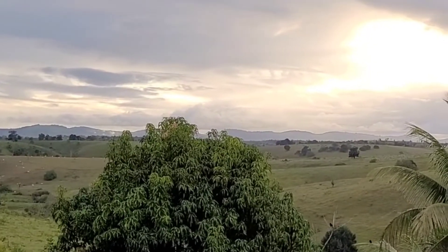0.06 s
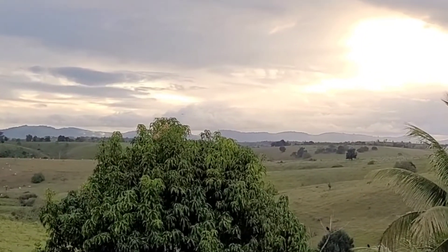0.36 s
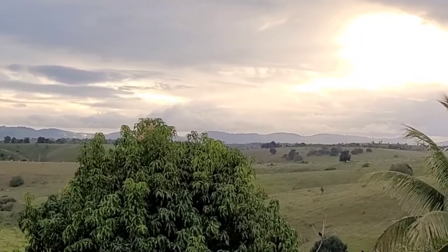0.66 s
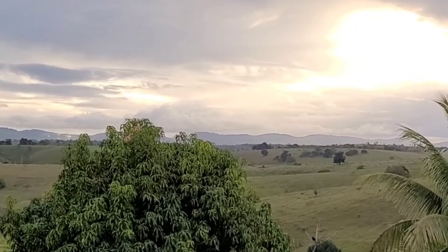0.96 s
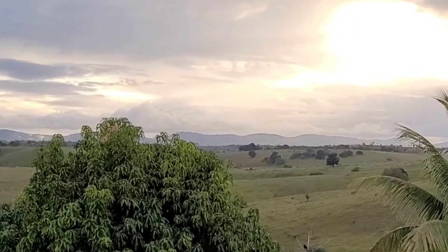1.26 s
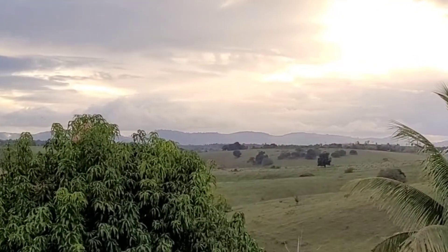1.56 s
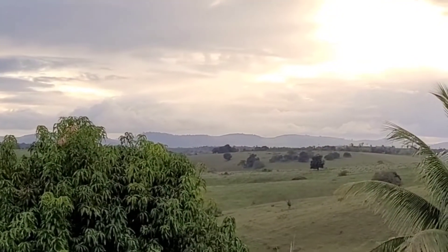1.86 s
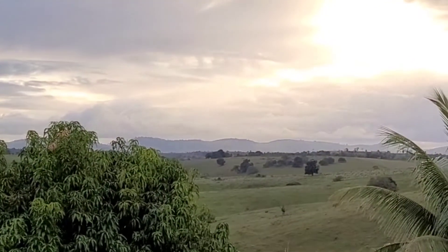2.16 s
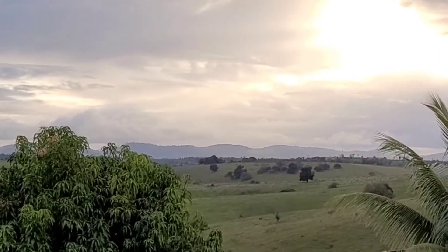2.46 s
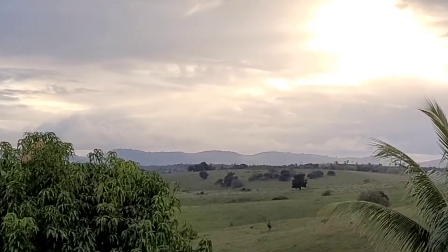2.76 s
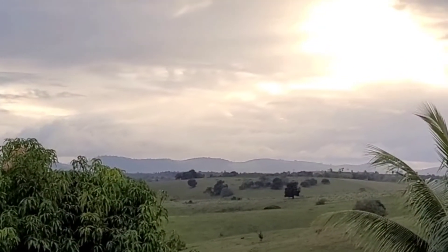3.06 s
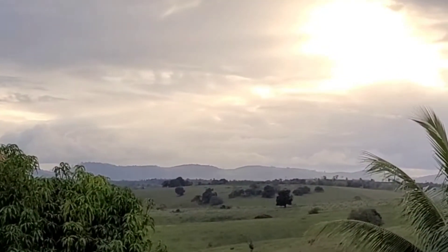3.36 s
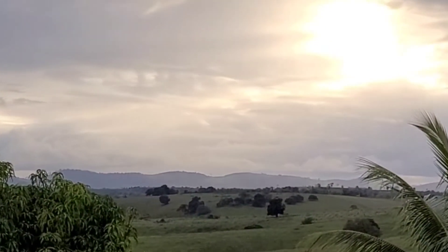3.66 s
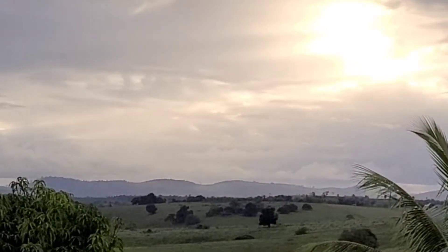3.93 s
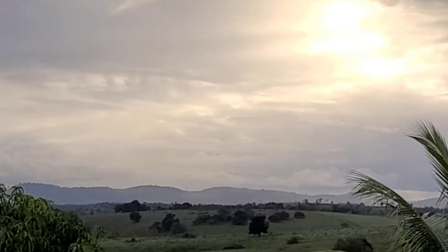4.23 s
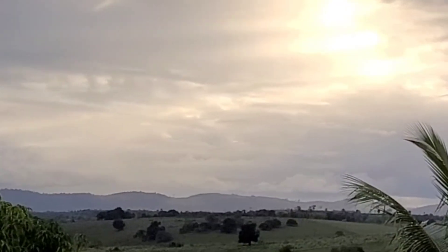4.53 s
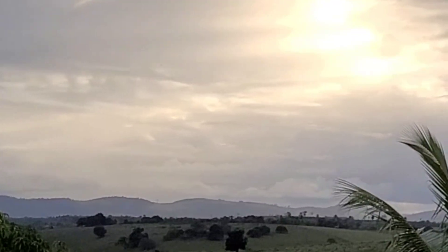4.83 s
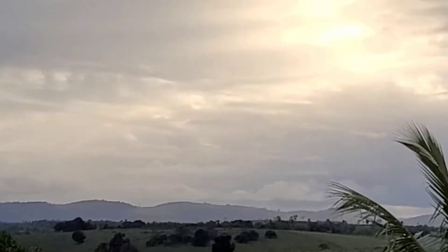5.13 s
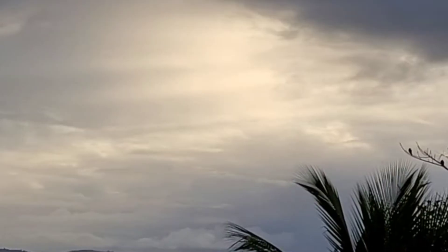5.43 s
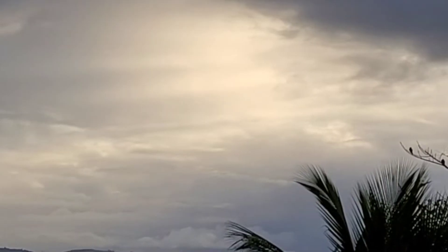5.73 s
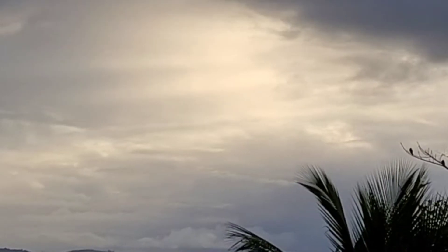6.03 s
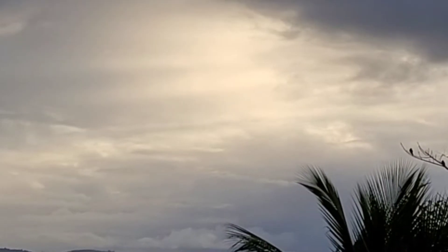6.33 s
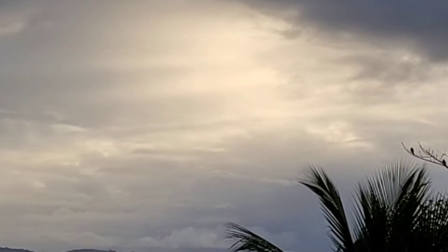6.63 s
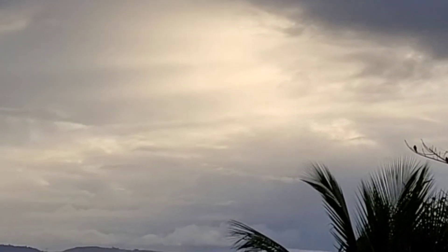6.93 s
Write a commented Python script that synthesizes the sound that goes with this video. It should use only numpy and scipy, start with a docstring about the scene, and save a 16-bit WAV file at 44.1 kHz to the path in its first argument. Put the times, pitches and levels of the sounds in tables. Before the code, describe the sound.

A continuous high-pitched chorus of crickets and katydids fills the countryside while birds give brief chips and falling whistles, mostly near the end.

```python
"""Dusk over open pasture

Choirs of crickets trill without a break, a few chirp close by and katydids hiss above them, all by
stridulation: a scraper drawn over a file rings the wings. Birds give gliding whistles, thin chips and
two hoarse calls that scatter back from the trees. A far animal hoots, the air rumbles faintly, and a
hand rubs and bumps the phone through which all this is heard, turning it up to the sky."""
import sys
import numpy as np
from scipy import signal
from scipy.fft import rfft, irfft
from scipy.io import wavfile

SR = 44100
rng = np.random.default_rng(int(sys.argv[2]) if len(sys.argv) > 2 else 0)


def to_wav(s):
    """Save 16-bit WAV."""
    ch = np.atleast_2d(s).T  # columns
    pcm = np.round(np.clip(ch, -1, 1) * 32767)  # PCM
    wavfile.write(sys.argv[1], SR, pcm.astype(np.int16))


N = 308259
T = np.arange(N) / SR
TOP_HZ = 15550  # upper limit of the phone's passband


# Wing resonance of the low choir. Each row: frequency in Hz, relative level in dB.
LOW_SPECTRUM = [(3950, -73), (4250, -19), (4400, -12), (4520, -2), (4650, -3.5), (4760, 0), (4860, -3.5),
                (4950, -2.5), (5060, -11.5), (5200, -33), (5400, -52)]
# Crickets that stand out of it. Each row: wing pitch in Hz, strokes per second, relative level in dB.
LOW_SOLOISTS = [(4773, 44.4, -3.5), (4719, 47, -7), (4645, 32.3, -9.5)]

def low_crickets(fade_db_per_s=0.63):
    """Superposition: many far crickets merge into a band of noise, and a few nearer ones ring through."""
    song = choir(LOW_SPECTRUM, stroke_hz=43.4, depth=0.1, flicker_db=0.47) * undb(-0.5)
    for hz, rate, db in LOW_SOLOISTS:
        solo = trill(hz, rate, sag_hz=110.7, scatter_db=2.5, echo_db=5, drift_hz=16, slip=0.7)
        song += solo * undb(db + 0.6 * walk(2.85))
    return song * undb(-32.5 - fade_db_per_s * T + surge_db()) * pan(-2 + 4 * turn())


# Surges of the low choir. Each row: start in seconds, length in seconds, level change in dB.
SURGES = [(-.17, 0.2, -2), (.2, 1.4, 3), (1.15, 1.53, 3.5), (2.93, 0.68, 3.5), (3.97, 0.6, 3),
          (4.75, 0.91, 3.5), (5.5, 0.51, 2), (6.17, 0.85, 2.5)]

def surge_db():
    """Independent sources add in power, so the choir grows louder as neighbours join in."""
    return phrases(SURGES, edge=0.36)


# Wing resonance of the high choir. Each row: frequency in Hz, relative level in dB.
HIGH_SPECTRUM = [(5600, -25), (5800, -7), (5930, -6), (6020, -1.5), (6120, -3), (6290, .5), (6480, 0),
                 (6620, -5), (6720, -12), (6900, -20), (7000, -42), (7300, -80)]
# Crickets that stand out of it. Each row: wing pitch in Hz, strokes per second, relative level in dB.
HIGH_SOLOISTS = [(5890, 45, -22), (6080, 57.5, -14), (6270, 68, -12.5)]

def high_crickets(surge_share=0.21):
    """Wings of higher resonance make a choir on the right that weakly follows each surge."""
    song = choir(HIGH_SPECTRUM, stroke_hz=62.3, depth=0.13, flicker_db=0.3)
    for hz, rate, db in HIGH_SOLOISTS:
        solo = trill(hz, rate, sag_hz=40.13, scatter_db=4, echo_db=3.5, drift_hz=10, slip=0.44)
        song += solo * undb(db + 2 * walk(3.68))
    return song * undb(-37 + surge_share * surge_db() - 2.5 * turn()) * pan(-7.5 + 5.5 * turn())


# Wing resonance of the middle choir. Each row: frequency in Hz, relative level in dB.
MIDDLE_SPECTRUM = [(5050, -25), (5200, -11), (5340, -4.5), (5470, -3), (5600, 0), (5780, -1), (5950, -10)]

def middle_crickets():
    """Incoherent wing tones sum to a steady band between the other two choirs."""
    return choir(MIDDLE_SPECTRUM, stroke_hz=38.6, depth=0.26, flicker_db=-1) * undb(-40.5) * pan(-2)


# Bouts of two neighbours singing together. Each row: start in seconds, length in seconds, level in dB.
BOUTS = [(-.2, 0.41, -38), (1.1, 1.63, -41), (3.515, 1.4, -40), (5.982, 0.53, -40.5), (6.553, 0.43, -41.5)]

def cricket_pair(ramp_s=0.094, rest_db=-73):
    """The ratio of direct sound to echo sets clarity: the leader sharpens as the phone turns to it."""
    bouts = sum(undb(db) * swell((T - s) / length, ramp_s / length) for s, length, db in BOUTS)
    leader = trill(5603, 39.1, sag_hz=60, scatter_db=1.2, echo_db=2 - 18 * turn(), drift_hz=7, slip=0.3)
    partner = trill(5478, 38, sag_hz=49.33, scatter_db=2.5, echo_db=3, drift_hz=4.9, slip=0.394)
    return (leader + undb(-8.5) * partner) * (undb(rest_db) + bouts) * pan(-1.1)


def choir(spectrum, stroke_hz, depth, flicker_db, groups=3):
    """Source and filter: wing strokes modulate the rasp of file and scraper, which rings the wings."""
    rasp = 0
    for _ in range(groups):
        rate = stroke_hz * (1 + 0.087 * rng.standard_normal() + 0.0292 * walk(3))
        strokes = np.exp(depth * np.cos(2 * np.pi * (np.cumsum(rate) / SR + rng.random())))
        rasp = rasp + strokes * undb(flicker_db * walk(9.8)) * noise()
    return unit(colour(rasp, spectrum))


def trill(wing_hz, stroke_hz, sag_hz, scatter_db, echo_db, drift_hz, slip):
    """A pulse train of sagging tones, blurred by grass; less phase slip per stroke gives purer pitch."""
    cycles = np.cumsum(stroke_hz * (1 + 0.0201 * walk(8))) / SR + rng.random()
    u, stroke = cycles % 1, cycles.astype(int)
    size, detune = np.sqrt(3) * rng.uniform(-1, 1, (1000, 2))[stroke].T
    hz = wing_hz + drift_hz * walk(4) + 14 * slip * detune + sag_hz * (0.5 - u)
    phase = 2 * np.pi * (np.cumsum(hz) / SR + slip * rng.random(1000)[stroke])
    tone = swell(u, 0.51) * undb(scatter_db * size) * np.sin(phase)
    return unit(unit(tone) + undb(echo_db) * unit(foliage(tone, t60=0.077)))


# Near chirps. Each row: first and last stroke in seconds, stroke count, level in dB, wing pitch in Hz.
CHIRPS = [ (0.171, .297, 7, -23.5, 4810), (0.336, 0.489, 8, -26, 4800), (.68, 0.784, 6, -23, 4800),
          (0.807, 0.899, 5, -17.5, 4806), (1.054, 1.146, 5, -24, 4820), (1.695, 1.781, 5, -22.5, 4800),
          (3.026, 3.305, 14, -28, 4770), (3.085, 3.352, 13, -21.5, 4990), (4.013, 4.259, 12, -23.5, 4800),
          (4.086, 4.381, 14, -20, 4960), (4.919, 5.009, 5, -22.5, 4830), (5.055, 5.328, 13, -21.5, 4976),
          (5.552, 5.88, 16, -25.5, 4930), (6.264, 6.55, 14, -26, 4770)]

def near_crickets(stroke_s=0.019, sag_hz=110, warm_up_hz=140, warm_up_db=11, scatter_db=0.8):
    """Each stroke drives the wing resonance in an arched tone; strokes grow louder and higher."""
    out, u = np.zeros(N), progress(stroke_s)
    arch_hz = sag_hz * (0.5 - u - 2 * (2 * u - 1) ** 2)
    for first, last, strokes, db, wing_hz in CHIRPS:
        chance = rng.standard_normal((20, 2))
        for k, s in enumerate(np.linspace(first, last, round(strokes))):
            size, detune = chance[k]
            slack = np.exp(-k / 2.2)  # dies away as the chirp gets going
            hz = wing_hz + 14 * detune + arch_hz - warm_up_hz * slack
            gain = undb(db - warm_up_db * slack + scatter_db * size)
            phase = 2 * np.pi * (np.cumsum(hz) / SR + rng.random())
            add(out, s - stroke_s / 2, gain * np.sin(np.pi * u) ** 2 * np.sin(phase))
    return out * pan(-5) + undb(-11) * foliage(out, t60=0.25)


def birds(treble_hz=5000):
    """Reverberation time falls with frequency: low notes linger among the trees longer than high ones."""
    notes = [*slurs(), *arches(), *near_whistle(), *chips()]
    low = sing([note for note in notes if note[1].max() < treble_hz], t60=0.52, waver=0.0094)
    high = sing([note for note in notes if note[1].max() >= treble_hz], t60=0.47, waver=0.0067)
    zipped = sing(zip_call(), t60=0.12, waver=0.011)
    return low + high + zipped + undb(-10) * foliage(zipped.mean(axis=0), t60=0.42)


def sing(notes, t60, waver):
    """Multipath fading: near-pure whistles flutter and flicker on their way through the foliage."""
    direct, far = np.zeros((2, N)), np.zeros(N)
    for s, glide_hz, db, side_db, lag_ms, echo_db in notes:
        t = T[:len(glide_hz)]
        distance = min(undb(echo_db), 3)  # far, echoing notes arrive rougher
        flutter = distance * np.interp(t * 250, np.arange(100), rng.standard_normal(100))
        hz = glide_hz * (1 + waver * flutter)
        phase = 2 * np.pi * (np.cumsum(hz) / SR - np.outer([0, lag_ms], hz) / 1000)
        # every note carries a faint octave, relatively stronger in louder notes
        octave = undb(-19 + db / 2) * (hz < SR / 4) * np.sin(2 * phase)
        flicker = np.interp(t * 160, np.arange(100), rng.standard_normal(100))
        fading_db = 4.9 * np.sqrt(min(distance, 1)) * flicker
        note = np.sqrt(2) * undb(db + fading_db) * swell(t / t[-1], 0.11) * (np.sin(phase) + octave)
        add(direct, s, note * pan(side_db))
        add(far, s, note[0] * undb(echo_db))
    return direct + undb(-1.5) * (foliage(far, t60) + trunks(far, t60 / 8))


# Contour of one long whistle. Each row: time in seconds, pitch in Hz, level in dB.
WHISTLE = [(3.392, 4800, -46), (3.402, 5160, -26), (3.408, 5580, -23.5), (3.435, 5755, -27),
           (3.465, 5640, -27), (3.5, 5580, -25.5), (3.533, 5330, -33), (3.56, 4830, -34)]

def near_whistle(side_db=9, lag_ms=0.06, echo_db=-15):
    """Direct sound dominates at close range: the nearest bird slides up to a loud arch and sinks away."""
    first, last = WHISTLE[0][0], WHISTLE[-1][0]
    hz, db = (curve[(T >= first) & (T < last)] for curve in curves(WHISTLE))
    yield first, hz, db, side_db, lag_ms, echo_db


# Gliding whistles, nearly all falling. Each row: start, lead-in and glide in seconds, first and last
# pitch in Hz, flattening from 0 to 1, level in dB, left minus right in dB, right-ear lag in ms,
# echo in dB, growth through the glide in dB.
SLURS = [ (2.44, 0.002, 0.11, 3700, 2580, 0.1, -55.5, -7, 0.24, 0.5, -1),
         (3.372, 0.002, 0.023, 3750, 4520, 0, -54, 0, 0.051, 9, 6),
         (3.555, 0, 0.039, 4500, 3740, 0.1, -59, 0, 0.073, 6.5, -11),
         (3.86, 0.0015, 0.04, 3410, 2500, 0.03, -66, -6, 0.062, 4.5, -4),
         (4.335, 0, .04, 8700, 7170, 0, -60, -10, 0, 13, -1),
         (4.508, 0.016, 0.046, 8300, 6930, 0.9, -33.5, -16, 0.063, 0, 4),
         (5.738, 0.062, 0.1, 3020, 2100, 0, -36, -0.5, 0.15, -4, 0),
         (5.776, 0.00015, 0.06, 2220, 1577, 0.57, -41.5, -10.5, 0.37, -5.5, 11),
         (5.885, 0.0023, 0.039, 2110, 1403, 0.25, -48, -8, 0.22, 0, -7),
         (6.105, 0.032, 0.075, 3220, 2060, 0.2, -37, -2, .14, -2.5, -2),
         (6.538, 0, 0.125, 2380, 1640, 0, -44, -11, 0.22, -2, 11),
         (6.646, 0, 0.15, 3680, 2350, 0.25, -44.5, -6, 0.16, -2.5, 1)]

def slurs(lead_db=-11):
    """Frequency glide: a soft held lead-in, then a slide that flattens out as it swells or fades."""
    for s, lead, glide, first, last, bend, db, side_db, lag_ms, echo_db, growth_db in SLURS:
        t = T[:int((lead + glide) * SR)]
        u = np.clip((t - lead) / glide, 0, 1)
        hz = first + (last - first) * u * (1 + bend * (1 - u))
        effort_db = growth_db * (u - 0.5) + lead_db * np.clip((lead - t) / 0.0059, 0, 1)
        yield s, hz, db + effort_db, side_db, lag_ms, echo_db


# Arched whistles. Each row: start and length in seconds, top pitch in Hz, place of the top from 0 to 1,
# droop factor, level in dB, left minus right in dB, right-ear lag in ms, echo in dB.
ARCHES = [ (1.43, 0.06, 2380, 0.3, 0.2, -68.5, -12, 0.079, 12),
          (1.675, 0.041, 3490, 0.3, 0.2, -71, 3, .14, 10),
          (1.742, 0.049, 2850, 0.3, 0.2, -72, -9, 0.089, 7), (3.15, 0.07, 7680, 0.3, 0.08, -49, 5, .027, 7),
          (3.369, 0.11, 1840, 0.12, 0.2, -73, -2, 0.15, 3),
          (3.51, 0.32, 2620, 0.42, 0.3, -66, -11, 0.063, -2),
          (4.293, 0.06, 8670, 0.5, 0.15, -57.5, -13, 0.034, 9),
          (6.886, 0.043, 2940, 0.47, 0.1, -34.5, 1.5, 0.18, -5),
          (6.926, 0.065, 2847, 0.32, 0.12, -29.5, 0, 0.23, -20)]

def arches(scoop=0.039, scoop_s=0.0093):
    """Parabolic modulation: pitch and level fall with the square of the time from the top."""
    for s, length, top_hz, top_at, droop, db, side_db, lag_ms, echo_db in ARCHES:
        u = progress(length)
        away = (u - top_at) ** 2
        flat_start = scoop * np.exp(-u * length / scoop_s)
        yield s, top_hz * (1 - droop * away - flat_start), db - 12 * away, side_db, lag_ms, echo_db


# Thin chips on the right. Each row: start in seconds, ring time in seconds, level in dB.
CHIPS = [(3.476, 0, -46), (3.518, 0.021, -37), (3.574, 0.027, -38.5)]

def chips(flick_s=0.01, settle_s=0.0058, from_hz=6600, to_hz=7740, ring_hz=7000):
    """A fast upward sweep is heard as a chip; some settle on a short ring."""
    right_bird_db, left_bird_db, lag_ms, echo_db = -13, 10, 0.05, -10
    for s, ring, db in CHIPS:
        t = T[:int((flick_s + ring) * SR)]
        hz = np.interp(t, [0, flick_s, flick_s + settle_s], [from_hz, to_hz, ring_hz])
        yield s, hz, db, right_bird_db, lag_ms, echo_db
    hz = from_hz + (to_hz - from_hz) * progress(flick_s)
    yield 3.376, hz, -39, left_bird_db, lag_ms, echo_db  # a bird on the left flicks once


# Partials of one sharp upward zip. Each row: frequency ratio, relative level in dB.
ZIP_PARTIALS = [(1, 2.5), (1.45, -8), (2, -6)]

def zip_call(start_s=5.663, length_s=0.019, from_hz=6700, to_hz=14200, lag_ms=0.032, echo_db=-1):
    """Interaural level varies with frequency: as three partials sweep up, the top favours the left ear."""
    u = progress(length_s)
    sweep = from_hz + (to_hz - from_hz) * u
    for ratio, db in ZIP_PARTIALS:
        heard = ratio * sweep < TOP_HZ
        hz = ratio * sweep[heard]
        side_db = np.interp(hz, [from_hz, to_hz], [-11, 14])
        yield start_s, hz, db - 25.5 - 12.5 * u[heard], side_db, lag_ms, echo_db


# Hoarse calls. Each row: start in seconds, length in seconds, level in dB.
CROAKS = [(5.878, 0.18, -45.5), (6.305, 0.093, -41.5)]
# Throat resonances. Each row: centre in Hz, bandwidth in Hz, gain in dB.
FORMANTS = [(740, 330, 2.5), (1154, 127, 14.5), (1760, 500, -18), (2440, 170, 2)]

def croaks(rattle_hz=95):
    """Formant filtering: a far bird's throat shapes rattling noise, heard mostly as echo."""
    effort = sum(undb(db) * swell((T - s) / length, 0.38) for s, length, db in CROAKS)
    rasp = rng.standard_normal(N) * np.exp(0.25 * np.cos(2 * np.pi * rattle_hz * T))
    voice = sum(undb(db) * signal.lfilter(*signal.iirpeak(hz, hz / width, fs=SR), rasp)
                for hz, width, db in FORMANTS)
    band = signal.butter(2, [450, 3000], "band", fs=SR, output="sos")
    call = effort * unit(signal.sosfilt(band, voice))
    return undb(-5) * call * pan(-19) + undb(0.5) * foliage(call, t60=0.5)


# Wing resonance of the hissing katydids. Each row: frequency in Hz, relative level in dB.
HISS_SPECTRUM = [(7000, -22), (9000, -22), (10500, -20), (11300, -1.5), (12600, -13), (13400, 0.5),
                 (14000, 0), (14230, 6), (14550, 2.5), (15500, -4.5)]

def hissing_katydids(fade_db_per_s=0.5, surge_share=0.42):
    """Broadband stridulation makes a thin hiss on the left that surges with the crickets."""
    db = -45 - fade_db_per_s * T + surge_share * surge_db() - 2 * turn()
    return choir(HISS_SPECTRUM, stroke_hz=52.8, depth=0.42, flicker_db=-0.3) * undb(db) * pan(10)


# Wing resonance of the lisping katydids. Each row: frequency in Hz, relative level in dB.
LISP_SPECTRUM = [(8500, -41), (9100, -2), (9490, 2.5), (9850, 4.5), (10200, -16.5), (10800, -6)]
# Their phrases. Each row: start in seconds, length in seconds, rise in dB.
LISP_PHRASES = [(.22, 0.92, 4.5), (1.2, 0.83, 3), (2.2, 0.71, 2.5), (3.02, 0.59, 4.5), (3.55, 0.41, 2.5),
                (3.97, 0.61, 4.5), (4.4, 1.16, 3), (5.55, 0.46, 4.5), (6.3, 0.69, 2.5)]

def lisping_katydids():
    """Slow amplitude modulation groups a narrow band of rasp into phrases."""
    db = -51.5 + phrases(LISP_PHRASES, edge=0.35) - 2.5 * turn()
    return choir(LISP_SPECTRUM, stroke_hz=44.8, depth=0.33, flicker_db=1.4) * undb(db) * pan(0.17)


# Wing resonance of the buzzing katydid. Each row: frequency in Hz, relative level in dB.
BUZZ_SPECTRUM = [(11000, -27), (11950, -25), (12096, 6), (12230, -1), (12375, 5), (12550, -8), (13300, -10)]

def buzzing_katydid(first_peak_s=0.45, period_s=1, swing_db=3.5):
    """Periodic amplitude modulation: a rasp on the left keeps time in a rounded square wave."""
    beat = np.cos(2 * np.pi * (T - first_peak_s) / period_s)
    db = -53.5 + swing_db * np.tanh(2 * beat + 0.51) - 8 * turn()
    return choir(BUZZ_SPECTRUM, stroke_hz=68, depth=0.27, flicker_db=3.5) * undb(db) * pan(7.2)


# The hand bumps the phone. Each row: start in seconds, thud in dB, thud decay in seconds, tick in dB.
BUMPS = [(4.983, -39.5, 0.028, -46), (5.317, -33.5, 0.042, -39), (5.374, -34, 0.013, -58),
         (5.402, -62, 0.0089, -39)]
# Spectra of the thud and the tick. Each row: frequency in Hz, relative level in dB.
THUD_SPECTRUM = [(25, -15), (70, 17), (130, 1), (250, 5), (400, -25), (900, -22)]
TICK_SPECTRUM = [(300, -8), (900, -8), (2400, -2), (3500, -4), (9000, -1), (15000, -2)]

def bumps():
    """Structure-borne sound: each impact sends a small tick and a dull thud through the phone's body."""
    thud, tick = np.zeros(N), np.zeros(N)
    for s, thud_db, decay, tick_db in BUMPS:
        add(thud, s, undb(thud_db) * np.exp(-T / decay) * (1 - np.exp(-T / 0.0032)))
        add(tick, s, undb(tick_db) * np.exp(-T / 0.0046))
    body = unit(colour(noise() + rng.standard_normal(N), THUD_SPECTRUM))
    return thud * body + tick * unit(colour(noise(), TICK_SPECTRUM))


def squeak(start_s=5.393, length_s=0.0115, top_hz=2130, drop_hz=600):
    """Stick-slip friction: a fingertip squeaks on the case, dropping in pitch as it lets go."""
    out, u = np.zeros(N), progress(length_s)
    hz = top_hz - drop_hz * u ** 4
    add(out, start_s, undb(-48) * u * swell(u, 0.23) * np.sin(2 * np.pi * np.cumsum(hz) / SR))
    return out


# Spectrum of fingers rubbing the case. Each row: frequency in Hz, relative level in dB.
RUB_SPECTRUM = [(60, -20), (110, 0), (170, 2), (260, 2), (350, -7.5), (700, -27)]

def grip(start_s=3.84, length_s=1.91):
    """Sliding friction makes a soft low rumble as the hand tilts the phone."""
    pressure = swell((T - start_s) / length_s, 0.21)
    return unit(colour(noise() + rng.standard_normal(N), RUB_SPECTRUM)) * undb(-58.5) * pressure


# The phone swings up to the sky. Each row: time in seconds, share of the turn from 0 to 1.
TURN = [(0, 0.04), (4.9, 0.05), (5.3, 0), (5.55, 0.8), (6.1, 0.85), (6.99, 0.8)]

def turn():
    """Directivity: this share of the turn shifts the level and balance of the insects."""
    return curves(TURN)[0]


# A very distant animal. Each row: start and length in seconds, top pitch in Hz, level in dB.
HOOTS = [(4.26, 0.55, 585, -63.5), (5.17, 0.17, 605, -59.5)]

def hoots(droop=0.091):
    """Faint arched tones cross the pasture and arrive as scattered sound alone."""
    out = np.zeros(N)
    for s, length, hz, db in HOOTS:
        u = np.clip((T - s) / length, 0, 1)
        pitch = hz * (1 - droop * (2 * u - 1) ** 2 + 0.034 * walk(40))
        out += undb(db) * swell(u, 0.12) * np.sin(2 * np.pi * np.cumsum(pitch) / SR)
    return foliage(out, t60=0.092)


# Spectrum of the open air. Each row: frequency in Hz, relative level in dB.
AIR_SPECTRUM = [(15, -46), (25, -27), (41, -8), (62, 2), (90, -10.5), (106, -5), (124, -9.5), (146, -18),
                (173, -14), (202, -20.5), (223, -14), (246, -16.5), (300, -16.5), (343, -23.5), (543, -24),
                (590, -26), (951, -30), (3600, -32), (4680, -44), (7920, -120)]

def air(crossover_hz=350):
    """Coherence falls with frequency: both ears share the distant rumble, but not the thin hush."""
    rumble = signal.lfilter(*signal.butter(1, crossover_hz, fs=SR), rng.standard_normal(N))
    # the two microphones turn the phase of the deepest bass differently
    shifted = rumble - 2 * signal.lfilter(*signal.butter(1, 35, fs=SR), rumble)
    hush = signal.lfilter(*signal.butter(1, crossover_hz, "high", fs=SR), noise()) + 0.26 * noise()
    return unit(colour(np.array([shifted, rumble]) + hush, AIR_SPECTRUM)) * undb(-51.5 + 0.5 * walk(6))


def foliage(x, t60):
    """Diffuse scattering from leaves and slopes: each ear's echo decays by 60 dB in t60 seconds."""
    t = T[:SR]
    tail = rng.standard_normal((2, SR)) * undb(-60 * t / t60) * (1 - np.exp(-t / 0.0017))
    return signal.fftconvolve(x[None], unit(tail) / np.sqrt(SR), axes=1)[:, :N]


def trunks(x, spread_s, count=7):
    """Early reflections from nearby trunks and slopes reach each ear at different delays."""
    out = np.zeros((2, N))
    for ear in out:
        for late, sign in rng.uniform(0, 1, (count, 2)):
            add(ear, 0.006 + spread_s * late, np.sign(sign - 0.5) * np.exp(-late) * x)
    return out / np.sqrt(count)


def undb(db):
    """Decibels to amplitude ratio."""
    return 10 ** (np.asarray(db) / 20)


def unit(x):
    """Normalise to rms 1."""
    return x / np.sqrt(np.mean(x ** 2) + 1e-20)


def curves(table):
    """Linear interpolation of each column against the first, time."""
    s, *columns = np.transpose(table)
    return [np.interp(T, s, column) for column in columns]


def pan(db):
    """Constant-power gains for a level difference, left minus right."""
    gains = undb(np.array([[1], [-1]]) * db / 2)
    return gains / np.sqrt(np.mean(gains ** 2, axis=0))


def colour(x, points):
    """Filter by a (Hz, dB) spectrum that falls away beyond its ends."""
    hz, db = np.transpose(points)
    octave, knots = np.log2(np.arange(N // 2 + 1) * SR / N + 1), np.log2(hz)
    beyond = np.abs(octave - np.clip(octave, knots[0], knots[-1]))
    return irfft(rfft(x) * undb(np.interp(octave, knots, db) - 260 * beyond), N)


def noise():
    """Uncorrelated white noise for the two ears."""
    return rng.standard_normal((2, N))


def walk(rate):
    """Random drift with a spread near 1, through `rate` new values a second."""
    return 1.193 * np.interp(T * rate, np.arange(400), rng.standard_normal(400))


def add(track, s, sound):
    """Superpose a sound on a track at s seconds."""
    part = track[..., max(int(s * SR), 0):][..., :sound.shape[-1]]
    part += sound[..., :part.shape[-1]]


def swell(u, edge):
    """Tapered window over u = 0..1; each ramp takes the share `edge`."""
    return np.sin(np.pi / 2 * np.clip(np.minimum(u, 1 - u) / edge, 0, 1)) ** 2


def phrases(table, edge):
    """Level contour in dB, one swell for each row."""
    return sum(db * swell((T - s) / length, edge) for s, length, db in table)


def progress(length):
    """A ramp from 0 to 1 over a length in seconds."""
    return np.arange(int(length * SR)) / (length * SR)


def scene():
    """Linear superposition of everything that sounds over the pasture."""
    crickets = low_crickets() + middle_crickets() + cricket_pair() + high_crickets() + near_crickets()
    katydids = lisping_katydids() + buzzing_katydid() + hissing_katydids()
    return crickets + katydids + birds() + croaks() + hoots() + bumps() + squeak() + grip() + air()


def record(dry):
    """Band limiting: the phone's steep low-pass filter cuts the highest treble."""
    return signal.sosfilt(signal.ellip(10, 0.2, 80, TOP_HZ, fs=SR, output="sos"), dry)


dry = scene()
out = record(dry)
to_wav(out)
```